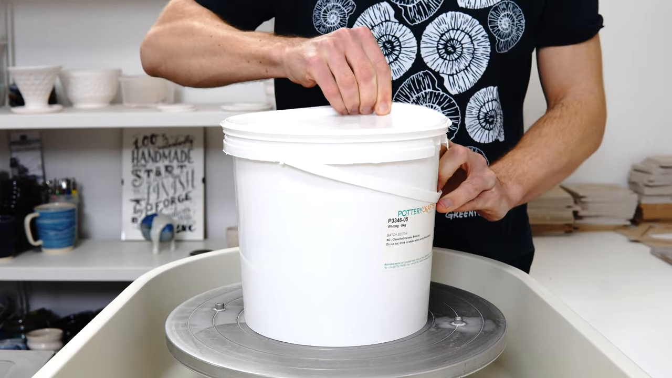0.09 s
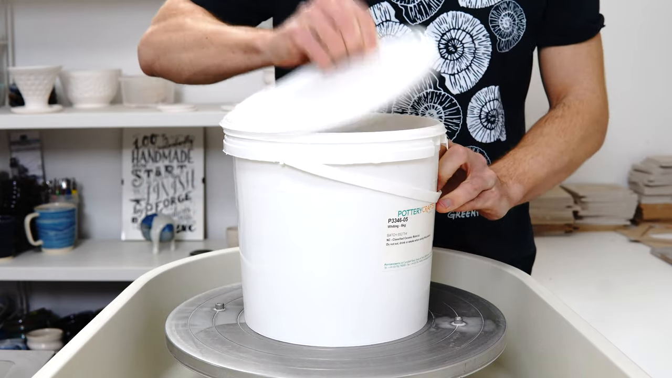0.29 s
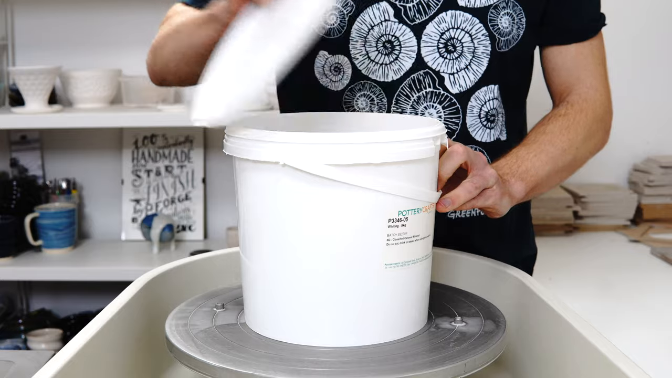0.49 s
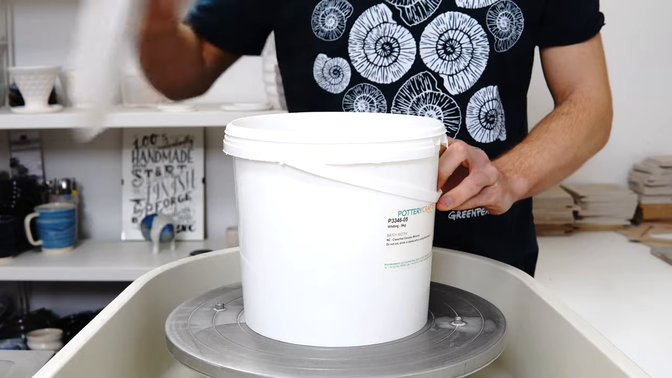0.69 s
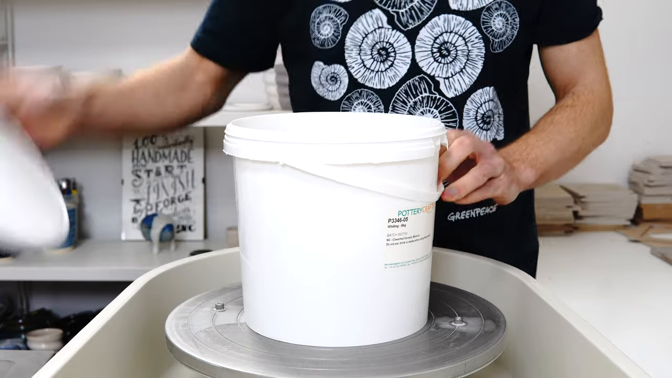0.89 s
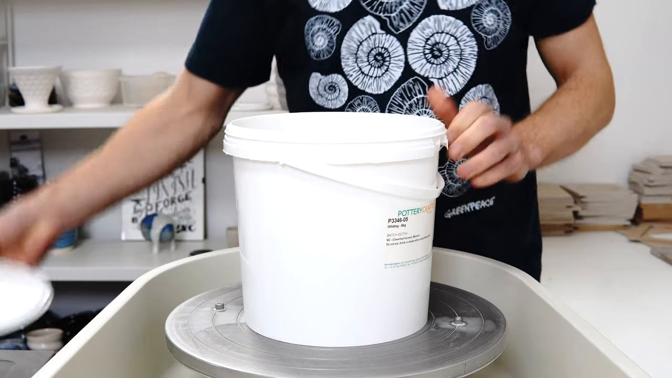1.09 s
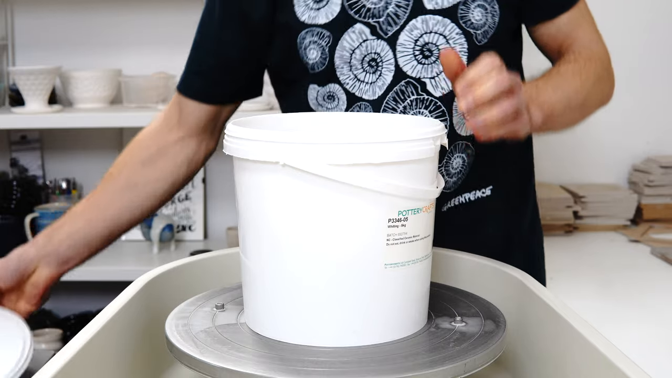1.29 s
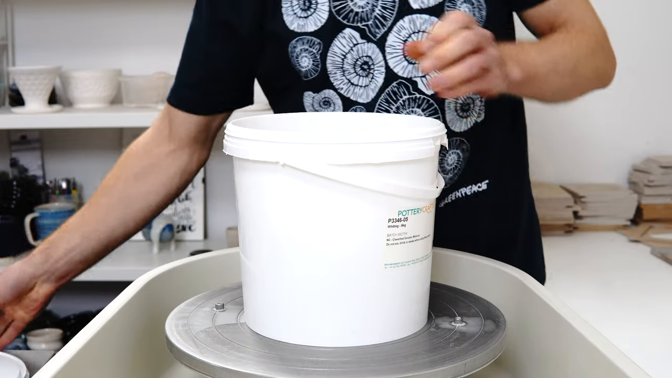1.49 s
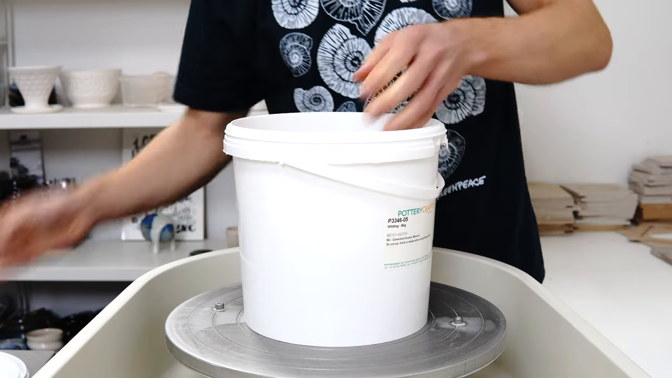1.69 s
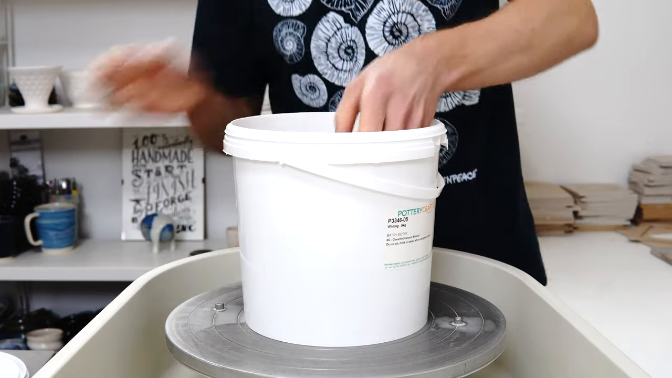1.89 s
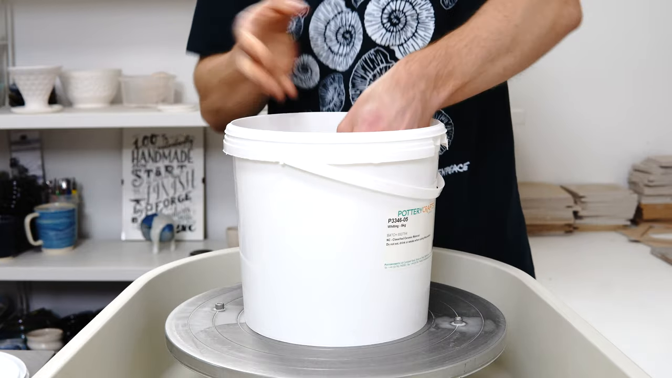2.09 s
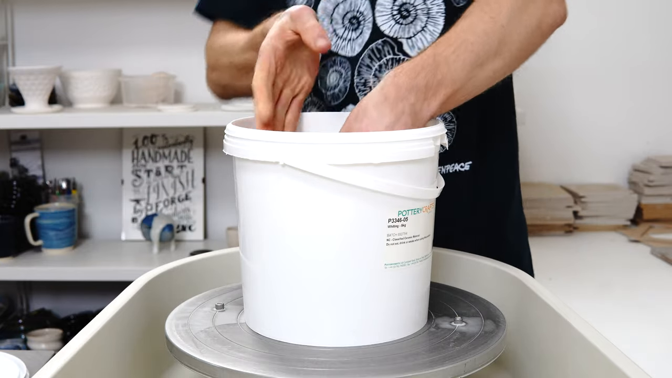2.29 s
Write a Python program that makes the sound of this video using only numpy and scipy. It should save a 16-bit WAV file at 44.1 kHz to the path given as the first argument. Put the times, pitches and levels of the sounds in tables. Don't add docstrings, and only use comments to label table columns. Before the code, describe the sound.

A tight plastic lid is prised off a tub: faint scraping, then from 0.2 to 0.4 seconds a rapid run of cracks and deep hollow thumps, distorting at peaks, with a last pop at 0.5. Light rubbing and squeaks around 0.8-1.1, with a faint pot ring. At 1.4 the lid slaps a bench, bouncing at 1.6. A hand scuffs inside at 2.3. Quiet low rumble, small hard room.

```python
import sys
import numpy as np
from scipy import signal
from scipy.fft import rfft, irfft
from scipy.io import wavfile

SR = 44100
rng = np.random.default_rng(int(sys.argv[2]) if len(sys.argv) > 2 else 0)


def waveform_to_disk(signal):
    frames = np.transpose(np.atleast_2d(signal))
    scaled = np.clip(frames, -1, 1) * 32767
    samples = np.round(scaled).astype(np.int16)
    wavfile.write(sys.argv[1], SR, samples)


def decibels_to_gain(level_db):
    exponent = np.asarray(level_db, float) / 20
    return 10 ** exponent


N = 105840


def evened(x):
    return x / np.sqrt(np.mean(x ** 2) + 1e-20)


def read(points, hz):
    f, value = np.transpose(points)
    return np.interp(np.log(hz + 1), np.log(f + 1), value)


def curve(points, outside_db=-90):
    s, db = np.transpose(points)
    return decibels_to_gain(np.interp(np.arange(N) / SR, s, db, outside_db, outside_db))


def arch(start_s, length_s):
    progress = np.clip((np.arange(N) / SR - start_s) / length_s, 0, 1)
    return np.sin(np.pi * progress) ** 2


def colour(x, points):
    log_gain = np.log(decibels_to_gain(read(points, abs(np.fft.fftfreq(N, 1 / SR)))))
    gain = np.exp(np.conj(signal.hilbert(log_gain)))[:N // 2 + 1]
    return irfft(rfft(x) * gain / np.sqrt(np.mean(abs(gain) ** 2)), N)


def resonate(x, hz, width_hz):
    turn = np.exp(2j * np.pi * np.cumsum(hz * np.ones(N)) / SR)
    r = np.exp(-np.pi * width_hz / SR)
    return 2 * (turn * signal.lfilter([1 - r], [1, -r], x / turn)).real


def ring(x, hz, width_hz):
    return resonate(x, hz, width_hz) / (2 - 2 * np.exp(-np.pi * width_hz / SR))


def clicks(times_s, levels_db):
    x = np.zeros(N)
    x[np.round(np.asarray(times_s) * SR).astype(int)] = decibels_to_gain(np.asarray(levels_db))
    return x


def bursts(x, rise_s, t60_s):
    t = np.arange(SR // 2) / SR
    shape = (1 - np.exp(-t / rise_s)) * decibels_to_gain(-60 * t / t60_s)
    return signal.oaconvolve(x, shape)[:N]


def grit(per_s, spread_db, smooth):
    chance, size = rng.random(N), rng.exponential(1, N)
    noise = rng.standard_normal((2, N))
    slips = (chance < per_s / SR) * decibels_to_gain(spread_db * np.minimum(size, 4)) * noise[0]
    return evened(evened(slips) + smooth * noise[1])


def room(x, wet_db, count=1):
    # pitch_hz, t60_s
    echo_decay = [(150, 0.16), (500, 0.32), (1000, 0.36), (3000, 0.28), (8000, 0.32), (15000, 0.23)]
    wander_per_s = 9
    out = x.copy()
    slots = np.arange(200, SR - 20, 20)
    for k in range(count):
        taps = np.zeros(SR)
        taps[slots + rng.integers(0, 20, len(slots))] = rng.choice([-1., 1.], len(slots))
        hz, t, z = signal.stft(taps, SR, nperseg=256)
        fading = z * decibels_to_gain(-60 * t / read(echo_decay, hz)[:, None])
        tail = signal.istft(fading, SR, nperseg=256)[1]
        share = 1
        if count > 1:
            turns = np.arange(N) / SR * wander_per_s + k / count
            share = np.cos(np.pi * turns) * np.sqrt(2 / count)
        out += decibels_to_gain(wet_db) * signal.fftconvolve(x * share, tail / np.linalg.norm(tail))[:N]
    return out


def tub():
    # start_s, air_db, wall_db, crack_db
    clips = [(0.189, -22.5, -34, -35.5), (0.201, -42, -22, -53), (0.221, -8.5, -12.5, -21.5),
             (.232, -13, -9, -33), (0.246, -5.5, -3.5, -26.5), (.258, -3, -5, -19),
             (.279, -22.5, 3.5, -21.5), (0.284, -17, 0, -33), (0.293, 2, -6, -35), (0.311, -15.5, -2, -21),
             (0.325, 1, -8, -34), (0.344, -0.5, -17.5, -26.5), (0.353, -3.5, -11, -19),
             (.362, -6, -20, -17.5), (.371, -12.5, -20, -20.5), (0.385, -26, -22, -31),
             (0.411, -34, -37, -27.5), (.43, -24, -30, -41), (0.51, 0.5, -6, -26), (0.512, -33, -34, -15.5),
             (0.5201, 0.5, -34, -27.5), (0.548, -10, -29, -40), (0.53, -18, -36, -35.5),
             (0.573, -22, -44, -34)]
    # time_s, pitch_hz
    air_note = [(0, 293), (.15, 290), (0.198, 242), (0.252, 240), (0.301, 259.4), (0.341, 302), (.38, 307),
                (.52, 318), (.7, 348)]
    # time_s, pitch_hz
    wall_note = [(0, 189), (.19, 195), (0.249, 206), (0.298, 219.6), (.36, 247), (.52, 240)]
    # start_s, level_db
    puffs = [
        (0.219, -5.5),
        (0.28, -9),
        (0.512, -15.5),
        (2.285, -35.5),
        (2.313, -32.5),
    ]
    # time_s, level_db
    peeling = [(0, -41), (.05, -37.5), (.11, -54.5), (.15, -41.5), (.185, -41.5), (.2, -29), (.3, -27.5),
               (.38, -27), (.48, -37.5), (.54, -33.5), (.62, -52.5), (.74, -61)]
    # pitch_hz, level_db
    crack_tone = [(300, -30), (520, -5), (800, -2.5), (2200, -12.5), (3600, -8.5), (4300, -14.5),
                  (6700, -26), (16000, -38)]
    # pitch_hz, width_hz, level_db
    rim_modes = [(524, 70, 4.5), (1058, 28, -8), (818, 30, 8.5), (1930, 62, -10.5), (2510, 150, 3.5),
                 (3325, 95, -3.5), (3590, 97, -10), (4700, 130, -10)]
    puff_hz, heave_hz, heave_width_hz = 108.6, 35, 31.7
    swell_hz = 112
    lag_s = 0.003

    s, air_db, wall_db, crack_db = np.transpose(clips)
    t = np.arange(N) / SR
    slips, peel = grit(3000, 1.64, 1.0), curve(peeling)
    boom = resonate(ring(clicks(*np.transpose(puffs)), puff_hz, 49), puff_hz, 106)
    for db, note, width_hz, scrape_db in ((air_db, air_note, 26.1, 23.5),
                                          (wall_db, wall_note, 29.2, 21.5)):
        hz = np.interp(t, *np.transpose(note))
        push = clicks(s + lag_s, db) + 0.016 * decibels_to_gain(scrape_db) * slips * peel
        boom += resonate(ring(push, hz, width_hz), hz, swell_hz)

    rim = sum(decibels_to_gain(db) * resonate(slips, hz, width_hz) for hz, width_hz, db in rim_modes)
    force = peel + bursts(clicks(s, crack_db), rise_s=0.00065, t60_s=0.032)
    cracks = (colour(slips, crack_tone) + 0.3 * evened(rim)) * force
    heave = resonate(resonate(slips * peel, heave_hz, heave_width_hz), heave_hz, heave_width_hz)
    heave = decibels_to_gain(5) * evened(heave) * 0.006
    return room(0.69 * boom + cracks, wet_db=-8.5) + 0.32 * boom + heave


def lid_drop():
    # start_s, level_db, edge_brightness_db
    strikes = [(1.3547, -50.5, 2), (1.3971, -0.5, 1), (1.403, -7.5, 0.5), (1.411, -10, 0.5),
               (1.417, -13.5, -5.5), (1.427, -15.5, 0.5), (1.45, -10, -1.5), (1.49, -23.5, -1),
               (1.5238, -18.5, -2), (1.5572, -16, -8), (1.591, -4.5, 2.5), (1.602, -10, -5.5),
               (1.621, -7.5, -9), (1.629, -14, -8), (1.649, -22, 1.5), (1.70, -29, -14), (1.779, -38, -9)]
    # pitch_hz, level_db, t60_s
    lid_modes = [(177, -13, 0.21), (311, -7.5, 0.2), (349.2, -3, .17), (470, -3.5, 0.033),
                 (599, -6.5, 0.17), (853.6, -1, .3), (920, -6.5, 0.32), (704, -7.5, 0.11),
                 (1186, -4, 0.037), (1320, -12.5, 0.19), (1539, -6.5, 0.058), (1690, -12, 0.17),
                 (1972, -14.5, 0.44), (3570, -24, 0.033)]
    # pitch_hz, level_db
    slap_tone = [(90, -38), (190, -11.5), (850, -5.5), (1500, -10), (3600, -14), (4200, -22.5), (8000, -37),
                 (16000, -53.5)]
    slap_db, edge_db = 5, 1

    s, db, bright_db = np.transpose(strikes)
    rattle = grit(4000, 4.43, 0.38) * bursts(clicks(s, db + bright_db), rise_s=0.00015, t60_s=0.066)
    blow = 0.36 * clicks(s, db) + 0.01 * rattle
    modes = sum(decibels_to_gain(mode_db) * ring(blow, hz, 2.64 / t60_s) * (-1) ** k
                for k, (hz, mode_db, t60_s) in enumerate(lid_modes))
    modes = signal.lfilter(*signal.butter(2, 130, "high", fs=SR), modes)
    snap_db = 4.2 * db + 2 * bright_db + edge_db
    snap = rng.standard_normal(N) * bursts(clicks(s, snap_db), rise_s=0.0001, t60_s=0.0033)
    edge = resonate(snap, 4600, 3100)
    edge += decibels_to_gain(3.5) * resonate(snap, 6200, 2000)
    edge += decibels_to_gain(-16.0) * resonate(snap, 11000, 4000)
    slap = decibels_to_gain(slap_db) * 0.66 * colour(rattle, slap_tone)
    return room(modes + slap + 0.57 * edge, wet_db=-3, count=3) + edge


def rubbing():
    # time_s, level_db
    rub = [(.76, -63), (.8, -48.5), (.85, -51.5), (.9, -43.5), (.96, -47.5), (1.02, -48.5), (1.045, -39.5),
           (1.07, -40), (1.1, -43), (1.14, -52), (1.18, -61.5), (1.24, -59), (1.3, -63.5), (1.34, -59.5),
           (1.395, -58)]
    # pitch_hz, level_db
    rub_tone = [(250, -4), (500, -5.5), (1000, -1.5), (1400, -10.5), (1800, -6.5), (3500, -5),
                (6000, -15.5), (16000, -39)]
    # start_s, length_s, pitch_hz, level_db
    squeaks = [(1.028, .05, 1800, -42), (1.032, .025, 4520, -46), (.04, .035, 1080, -41),
               (1.74, .1, 850, -47), (.56, .11, 820, -43), (1.055, .081, 1780, -41.5),
               (1.079, .04, 1040, -45), (1.107, .054, 1720, -50), (.887, .12, 1698, -53),
               (1.351, .015, 2550, -49), (1.351, .012, 3200, -51.5), (2.338, .027, 3430, -50),
               (2.36, .039, 960, -41.5), (2.293, .049, 960, -42)]
    airy_hz, airy_width_hz = 7380, 11000
    chime_s, chime_hz, chime_db, chime_t60_s = 1.125, 1435, -54, 0.5

    slips = grit(4000, 1.6, 1.4)
    squeak = sum(decibels_to_gain(db) * evened(resonate(slips, hz, 55)) * arch(start_s, length_s)
                 for start_s, length_s, hz, db in squeaks)
    hiss = resonate(slips, airy_hz, airy_width_hz)
    airy = decibels_to_gain(-56) * hiss * arch(0.79, 0.23) ** 0.2
    skid = decibels_to_gain(-48) * hiss * arch(1.48, 0.083)
    chime = ring(clicks([chime_s], [chime_db]), chime_hz, 1.1 / chime_t60_s)
    chime = resonate(chime, chime_hz, 16)
    return room(colour(slips, rub_tone) * curve(rub) + squeak + airy + skid, wet_db=-6) + chime


def brushing():
    # time_s, level_db
    brush = [(2.27, -70), (2.285, -41.5), (2.3, -32.5), (2.32, -33.5), (2.345, -50.5), (2.364, -54),
             (2.369, -42), (2.4, -63)]
    # pitch_hz, level_db
    brush_tone = [(60, -13), (150, -5), (350, -2), (700, -17), (1800, -23), (4000, -21.5), (6000, -38.5),
                  (14000, -64.5)]
    # pitch_hz, width_hz, level_db
    inside = [(329, 46, 9), (996, 52, -7), (1740, 87, -17), (3430, 72, -22), (4260, 62, -20)]

    slips = grit(2500, 1.7, 1.2)
    hollow = evened(sum(decibels_to_gain(db) * resonate(slips, hz, width_hz) for hz, width_hz, db in inside))
    scuff = (colour(slips, brush_tone) + 0.34 * hollow) * curve(brush)
    return room(scuff * decibels_to_gain(-2.5), wet_db=-6)


def hush():
    # pitch_hz, level_db
    hush_tone = [(15, -26.5), (45, 1.5), (100, -5.5), (300, -22), (900, -31), (1400, -40.5), (4000, -43.5),
                 (16000, -55.5)]
    # pitch_hz, width_hz, level_db
    drones = [
        (42.74, 15, -42.5),
        (831, 130, -60),
        (978, 30, -61.5),
    ]

    air = rng.standard_normal((2, N))
    drone = sum(decibels_to_gain(db) * evened(resonate(resonate(air[1], hz, width_hz), hz, width_hz))
                for hz, width_hz, db in drones)
    return decibels_to_gain(-41) * evened(colour(air[0], hush_tone)) + drone


def scene():
    return (tub() + lid_drop() + rubbing() + brushing() + hush())[None]


def top_cut(x):
    return signal.sosfilt(signal.butter(12, 16650, fs=SR, output="sos"), x)


def record(dry):
    heard = signal.sosfilt(signal.butter(12, 15500, fs=SR, output="sos"), dry)
    clipped = np.clip(heard, -1.0, 1.0)
    mix = signal.lfilter(*signal.butter(2, 25, "high", fs=SR), clipped)
    return top_cut(mix)


dry = scene()
out = record(dry)
waveform_to_disk(out)
```